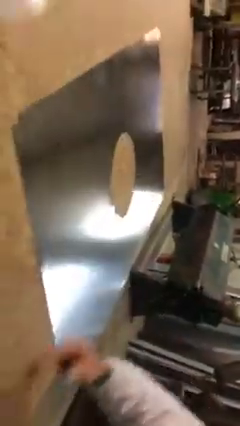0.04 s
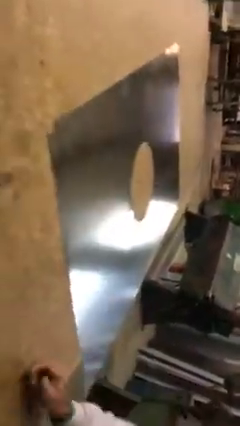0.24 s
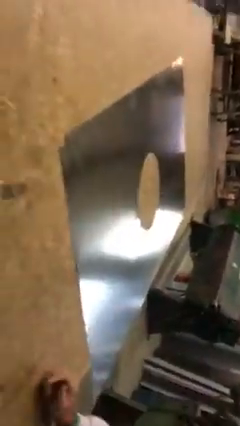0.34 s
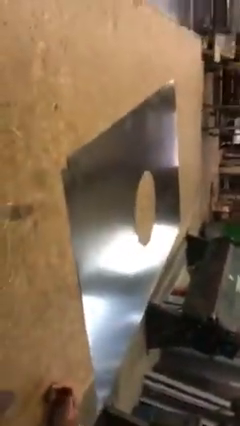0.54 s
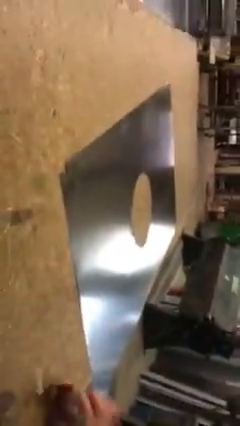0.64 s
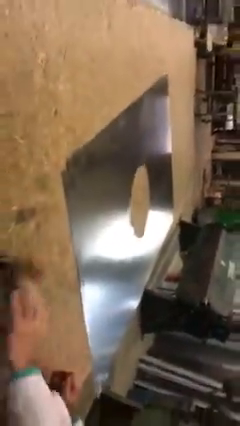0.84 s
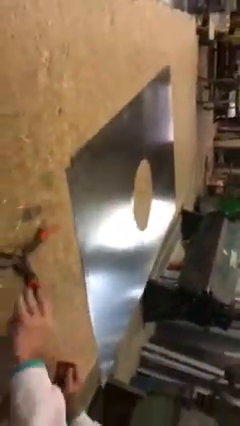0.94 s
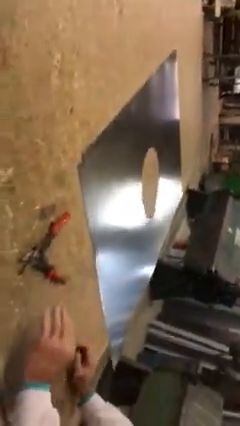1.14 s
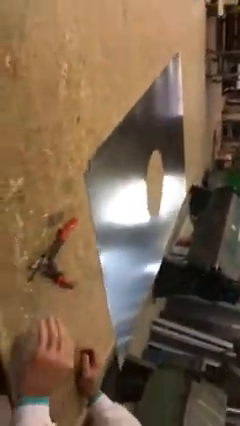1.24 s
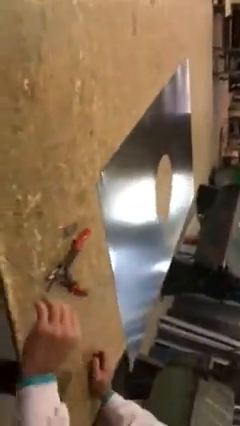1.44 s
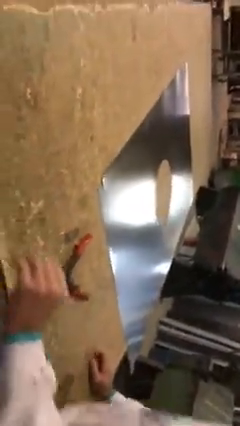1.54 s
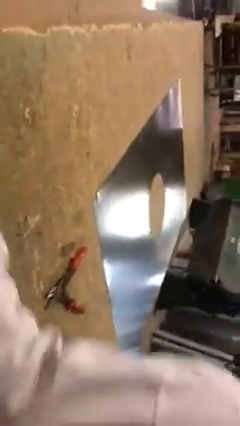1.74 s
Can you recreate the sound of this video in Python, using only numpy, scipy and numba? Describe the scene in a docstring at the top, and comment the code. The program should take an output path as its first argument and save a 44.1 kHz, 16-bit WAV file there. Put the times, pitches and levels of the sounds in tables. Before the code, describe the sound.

A large thin metal sheet slaps onto a wooden workbench at 0.2 seconds, just after a faint knock. It flexes and slaps again around 0.5, rattling and ringing. At 0.9 a tossed spring clamp clatters on the wood, bouncing to rest by 1.1. The sheet rasps lightly at 1.2 and 1.6. The sound is close, with slight workshop reverberation and a low machine hum that grows near the end.

```python
"""A faint knock and scrape, then a large thin metal sheet slaps down on a wooden workbench, flexes
and slaps again; its chattering contacts ring the metal and drum on the wood. A tossed spring clamp
bounces to rest, sending bending waves through the bench top. The sheet is nudged and rasps a little.
One microphone close to the bench, in mono; behind it the workshop reverberates and a machine hums low."""
import sys
import numpy as np
from scipy import signal
from scipy.fft import rfft, irfft
from scipy.io import wavfile
from numba import njit

SR = 44100
rng = np.random.default_rng(int(sys.argv[2]) if len(sys.argv) > 2 else 0)


def wav_out(sig):
    """Save sig, one row per channel (or a flat mono array), as 16-bit PCM at SR to the path in sys.argv[1]."""
    wavfile.write(sys.argv[1], SR, np.round(np.clip(np.atleast_2d(sig).T, -1, 1) * 32767).astype(np.int16))


N = 79380
TIME = np.arange(N) / SR

# Table levels are relative; spectra give the level per Hz.
# parts of the sheet landing: t/s, rise/s, fall/s, ring/dB, sizzle/dB, bench/dB, thud/dB
SLAPS = [(0.2075, 0.00017, 0.0058, -10, -43, -18, -35), (0.215, 0.0019, 0.0058, -31, -21.5, -14, -42),
         (0.236, 0.013, 0.0089, -10, -52, -33, -26), (0.256, 0.005, 0.032, -16, -26, -33, -28),
         (0.326, 0.015, 0.0077, -20, -42.5, -36, -40), (.350, 0.014, 0.033, -18, -29.5, -52, -56),
         (0.475, 0.012, 0.023, -24, -32, -33, -51), (0.51, 0.0095, 0.042, -16.5, -23.5, -36.5, -41),
         (0.532, 0.0024, 0.0069, -16, -26.5, -24, -34), (0.568, 0.023, 0.027, -25.5, -32.5, -40.5, -56),
         (0.611, 0.022, 0.025, -38.5, -36.5, -38, -38.5), (0.689, 0.017, 0.043, -35, -55, -48.5, -48)]
# the sheet's dense modes: f/Hz, level/dB
SHEET_SPECTRUM = [(300, -13.5), (550, -14), (800, -9.5), (1200, -2), (2100, -2), (3100, -3), (4200, -17.5),
                  (6500, -23), (10000, -29.5), (16000, -38.5)]
# their decay: f/Hz, t60/s
SHEET_T60 = [(300, .15), (700, 0.68), (1500, 0.31), (3000, .4), (6000, 0.74), (16000, 0.56)]
# sheet modes that stand out: f/Hz, level/dB, t60/s
SHEET_MODES = [(637.7, -18.5, 0.28), (1161, -25.5, 0.26), (1254, -17.5, 0.53), (1494, -21.5, .45),
               (1558, -26, 1), (1743, -15, 0.55), (2180, -22, .6), (2238, -17.5, .5), (2432, -21, 0.22),
               (2546, -16, 0.32), (3009, -28, 0.43)]
# the sheet's sizzling edges: f/Hz, level/dB
SIZZLE_SPECTRUM = [(1500, -5.5), (3500, 5), (6300, 6), (9000, -6.5), (12000, -5.5), (16000, -16)]
# the bench drumming under the sheet: f/Hz, level/dB
BENCH_SPECTRUM = [(90, -0.5), (150, -2.5), (230, 0), (330, 2.5), (450, -7), (700, -3), (1200, -10.5),
                  (2500, -31)]
# the sheet flexing: t/s, spread/s, f/Hz, climb/(octaves per s), level/dB
FLEXES = [(.222, .012, 1100, 12, -17.5), (.260, 0.018, 2050, 3, -16), (.325, .010, 715, 2.78, -27),
          (0.485, .013, 893, 11, -24.5), (.540, .02, 1700, 6.5, -32)]
# knocks, mostly the clamp: t/s, chirp/dB, contact low-pass/Hz, tick/dB, bench ring/dB, boom/dB
KNOCKS = [(0.112, -32, 1620, -63, -27.5, -7.5), (.2080, 17, 3380, 0.5, 2, 5),
          (0.8903, 8, 3440, -3.5, 2.5, 15), (.8918, 2, 3000, 4, 1, 0), (0.8929, 10.5, 3900, 4, 1.5, 5),
          (0.895, -14, 2960, -9, -5, -3), (0.9073, -6, 1200, -19, -3, 4), (0.917, -18, 3960, -11, -16, -18),
          (0.9321, -1, 4040, -6, -23, -18), (0.9368, 11, 3340, -9, -16, 6),
          (0.9384, 14.5, 4600, -1.5, -24, 16.5), (0.941, -13, 3050, -10, -20, -6),
          (.9660, 23, 1595, -8, -11.5, 10), (0.9689, 15, 1540, -31, -25, -9),
          (0.9708, 13.5, 1500, -24, -27, 5), (0.9912, -3, 1900, -31, -11, -14),
          (1.0016, 15, 1600, -18, -10, 10.5), (1.004, 10, 1500, -30, -24, -7),
          (1.0297, -13, 2600, -34, -20, 6.5), (1.0480, 11.5, 1940, -26, -25, -4),
          (1.0652, 6, 2120, -42, -18, -19), (1.0873, 6.5, 2540, -45, -21, -6),
          (1.5946, -5, 1550, -54, -11, -5.5)]
# the metal's tick: f/Hz, level/dB
TICK_SPECTRUM = [(800, -6.5), (2000, 6), (3300, 3.5), (5000, -6), (6500, -4), (9500, -6), (12500, -23),
                 (16000, -16.5)]
# modes of the knocked bench: f/Hz, level/dB, t60/s
BENCH_MODES = [(78.3, -46.5, 0.245), (120.7, -39.5, 0.23), (213, -30.5, 0.053), (329.4, -21.5, .09),
               (532, -31.5, 0.032), (726, -24, 0.032), (1211, -25.5, 0.031)]
# the bench frame rumbling under the clamp: t/s, rise/s, fall/s, level/dB
RUMBLES = [(.950, 0.024, 0.076, -36), (1.040, 0.022, 0.042, -36)]
# metal sliding on wood: t/s, rise/s, fall/s, rasp/dB, hiss/dB, sheen/dB
SLIDES = [(0.136, 0.011, 0.03, -53.5, -74, -65), (.835, 0.015, 0.062, -38.5, -54.5, -64),
          (1.204, 0.017, 0.033, -43.5, -65, -54.5), (1.32, 0.045, 0.026, -64, -67.5, -85),
          (1.618, 0.0066, 0.0089, -37.5, -45, -63), (1.633, 0.011, 0.011, -34, -42.5, -57),
          (1.651, 0.0097, 0.021, -32.5, -43.5, -59)]
# midrange of the friction: f/Hz, level/dB
RASP_SPECTRUM = [(200, -5.5), (500, -21), (1000, -15), (1600, -9.5), (1900, -4), (2120, 0.5), (2400, -6.5),
                 (3100, -8), (4000, -18), (7000, -21.5), (16000, -40.5)]
# its treble: f/Hz, level/dB
HISS_SPECTRUM = [(2500, -19.5), (5000, 6.5), (7000, -1.5), (9500, -3), (13000, -3.5), (16000, -11)]
# its very top: f/Hz, level/dB
SHEEN_SPECTRUM = [(8000, -22.5), (10500, -11), (12800, 0.5), (16000, -7.5)]
# workshop room tone: f/Hz, level/dB
FLOOR_SPECTRUM = [(20, -31.5), (45, -8), (70, -1), (110, -1.5), (160, -9.5), (250, -16.5), (450, -29),
                  (1000, -28.5), (2000, -32.5), (4000, -42), (8000, -49), (16000, -56)]
# the machine's hum, louder near the end: t/s, level/dB
HUM_LEVELS = [(0, -57.5), (1.15, -58), (1.35, -51), (1.5, -42), (1.8, -41)]
# the workshop's reverberation: f/Hz, level/dB
ROOM_SPECTRUM = [(100, 1.5), (400, -1.5), (1000, 0.5), (2200, -4), (4000, -2), (9000, -7), (16000, -11.5)]
# its decay: f/Hz, t60/s
ROOM_T60 = [(100, 0.2), (1000, 0.49), (2200, 0.76), (5000, 0.54), (16000, 0.38)]

CHATTER_PER_S, SLIDE_GRAINS_PER_S, GRAIN_SPREAD_DB = 7000, 5000, 2.5
EDGE_HZ, EDGE_RISE_HZ_PER_S = 424, 840   # low edge of the sheet's ring
THUD_HZ, BENCH_T60_S, TICK_T60_S = 67, 0.044, 0.026
CHIRP_LOW_HZ, CHIRP_TOP_HZ, BOOM_BAND_HZ = 745, 3600, (131.4, 480)
FLOOR_DB, HUM_HZ = -46, 123.5
HANDLING_DB, HANDLING_FADE_DB_PER_S = -52.5, 82.5
SHEET_SEND_DB, KNOCK_SEND_DB, SLIDE_SEND_DB = -18, -15, -13


def sheet(places=6):
    """Chatter at several places rings the sheet, sizzles at its edges and drums on the bench."""
    ring, sizzle, bench, thud = swells(SLAPS)
    metal = sum(through(ring * grains(CHATTER_PER_S), response(SHEET_SPECTRUM, SHEET_T60))
                for _ in range(places)) / np.sqrt(places)
    clear_modes = sum(from_db(db) * rms_one(mode(hz, t60)) * rng.choice([-1, 1])
                      for hz, db, t60 in SHEET_MODES) / np.sqrt(N)
    metal += through(ring * grains(CHATTER_PER_S), clear_modes)
    # the lowest ring climbs as the sheet lies flatter
    settling_s = np.clip(TIME - SLAPS[0][0], 0, SLAPS[-1][0] - SLAPS[0][0])
    edge_hz = EDGE_HZ + EDGE_RISE_HZ_PER_S * settling_s
    for _ in range(2):
        metal = moving_high_pass(metal, 2 * np.pi * edge_hz / SR, damping=0.97)
    wood = through(bench * grains(CHATTER_PER_S), response(BENCH_SPECTRUM, [(THUD_HZ, BENCH_T60_S)]))
    metal += flexes()
    edges = sizzle * colour(grains(CHATTER_PER_S), SIZZLE_SPECTRUM)
    return metal + wood + edges + thud * narrow_tone(THUD_HZ, width_hz=19)


def flexes():
    """Bending stiffens the sheet: a cluster of modes swells and glides upward."""
    out = 0
    for s, spread, hz, climb, db in FLEXES:
        octaves = climb * np.clip(TIME - s, -3 * spread, 3 * spread)
        offset_hz = hz * (2 ** octaves - 1)
        phase = np.angle(narrow_band(hz, width_hz=240)) + 2 * np.pi * np.cumsum(offset_hz) / SR
        out += from_db(db) * rms_one(np.cos(phase)) * np.exp(-((TIME - s) / spread) ** 2 / 2)
    return out * (TIME > SLAPS[0][0])


def knocks():
    """Each contact ticks in the metal, rings the bench and sends a falling chirp and boom through it."""
    chirps, ticks, pushes, booms = np.zeros((4, N))
    for s, chirp_db, contact_hz, tick_db, bench_db, boom_db in KNOCKS:
        click = signal.unit_impulse(N, int(s * SR))
        chirps += from_db(chirp_db) * butterworth(click, contact_hz, "low")
        ticks += from_db(tick_db) * through(click, metal_tick())
        pushes += from_db(bench_db) * click
        booms += from_db(boom_db) * click
    chirps = butterworth(chirps, CHIRP_LOW_HZ, "high")
    chirps = butterworth(chirps, CHIRP_TOP_HZ, "low", order=4)
    chirps = bending_wave(chirps, bend_hz=1300, stages=4)
    booms = butterworth(booms, BOOM_BAND_HZ, "band")
    booms = bending_wave(booms, bend_hz=273, stages=14)
    bench_ring = sum(from_db(db) * mode(hz, t60) * (-1) ** k
                     for k, (hz, db, t60) in enumerate(BENCH_MODES))
    rumble = swells(RUMBLES)[0] * narrow_tone(hz=77.7, width_hz=120)
    return chirps + booms + ticks + through(pushes, bench_ring) + rumble


def metal_tick():
    """Short response of heavily damped metal; unit energy."""
    tick = colour(even_noise(), TICK_SPECTRUM) * from_db(-60 * TIME / TICK_T60_S)
    return tick / np.linalg.norm(tick)


def bending_wave(x, bend_hz, stages):
    """Lows travel slower in the bench top: a chain of all-passes makes them arrive late."""
    pole = np.exp(-2 * np.pi * bend_hz / SR)
    for _ in range(stages):
        x = signal.lfilter([-pole, 1], [1, -pole], x + 1e-18)
    return x


def slides():
    """Fine grains of friction rasp and hiss as metal shifts on the wood."""
    spectra = RASP_SPECTRUM, HISS_SPECTRUM, SHEEN_SPECTRUM
    return sum(envelope * colour(grains(SLIDE_GRAINS_PER_S), spectrum)
               for envelope, spectrum in zip(swells(SLIDES), spectra))


def handling_ring():
    """At the start the sheet still rings faintly from being carried."""
    fade = from_db(HANDLING_DB - HANDLING_FADE_DB_PER_S * TIME)
    return fade * rms_one(narrow_band(hz=1810, width_hz=460).real)


def workshop():
    """Behind the bench: rumbling room tone and a machine humming on one low note."""
    hum_db = np.interp(TIME, *np.transpose(HUM_LEVELS))
    hum = from_db(hum_db) * rms_one(np.sin(2 * np.pi * HUM_HZ * TIME))
    return from_db(FLOOR_DB) * colour(even_noise(), FLOOR_SPECTRUM) + hum


def response(spectrum, t60s, bands=20):
    """Impulse response of modes too dense to count, each band dying at its own rate; unit energy."""
    hz, lines = np.fft.rfftfreq(N, 1 / SR), rfft(even_noise())
    edges_hz = np.geomspace(60, 18000, bands + 1)
    out = 0
    for low, high in zip(edges_hz, edges_hz[1:]):
        gain = from_db(at_hz(spectrum, hz)) * (hz >= low) * (hz < high)
        decay = from_db(-60 * TIME / at_hz(t60s, np.sqrt(low * high)))
        out += rms_one(irfft(lines * gain, N) * decay) * np.linalg.norm(gain)
    return out / np.linalg.norm(out)


def mode(hz, t60):
    """A decaying sine."""
    return np.sin(2 * np.pi * hz * TIME) * from_db(-60 * TIME / t60)


def grains(per_s):
    """Random tiny contacts of uneven size; unit rms."""
    sizes = from_db(GRAIN_SPREAD_DB * rng.standard_normal(N)) * rng.choice([-1, 1], N)
    return rms_one(sizes * (rng.random(N) < per_s / SR))


def swells(rows):
    """One envelope per level column: each event swells up to its time, then dies away."""
    power = 0
    for s, rise, fall, *levels in rows:
        shape = np.exp(-np.where(TIME < s, ((TIME - s) / rise) ** 2 / 2, (TIME - s) / fall))
        power += np.outer(from_db(levels), shape) ** 2
    return np.sqrt(power)


def narrow_tone(hz, width_hz):
    """A steady tone whose pitch wanders around hz; unit rms."""
    return rms_one(np.cos(np.angle(narrow_band(hz, width_hz))))


def narrow_band(hz, width_hz):
    """Complex noise in a narrow band."""
    offset_hz = np.fft.fftfreq(N, 1 / SR) - hz
    return np.fft.ifft(np.fft.fft(even_noise()) / (1 + (2 * offset_hz / width_hz) ** 4))


def even_noise():
    """Equally strong sines at every frequency, in random phase."""
    return rms_one(irfft(np.exp(2j * np.pi * rng.random(N // 2 + 1)), N))


def colour(x, spectrum):
    """Give a steady signal a spectrum; unit rms."""
    gain = from_db(at_hz(spectrum, np.fft.rfftfreq(N, 1 / SR)))
    return rms_one(irfft(rfft(x) * gain, N))


@njit
def moving_high_pass(x, step, damping):
    """Resonant high-pass; step is its moving corner in radians per sample."""
    out, low, band = np.zeros(len(x)), 0., 0.
    for i in range(len(x)):
        low += step[i] * band
        out[i] = x[i] - low - damping * band
        band += step[i] * out[i]
    return out


def butterworth(x, hz, kind, order=2):
    """Low-, high- or band-pass."""
    return signal.sosfilt(signal.butter(order, hz, kind, fs=SR, output="sos"), x + 1e-18)


def through(x, impulse):
    """Play a signal through an impulse response."""
    return signal.fftconvolve(x, impulse)[:N]


def at_hz(points, hz):
    """Read a table on a log-frequency axis."""
    f, value = np.transpose(points)
    return np.interp(np.log(hz + 1e-3), np.log(f), value)


def from_db(db):
    """Decibels to gain."""
    return 10 ** (np.asarray(db) / 20)


def rms_one(x):
    """Scale to unit rms."""
    return x / np.sqrt(np.mean(x ** 2) + 1e-20)


def scene():
    """Close to the bench: mostly direct sound, with the workshop's reverberation well below it."""
    background = handling_ring() + workshop()
    room = response(ROOM_SPECTRUM, ROOM_T60)
    metal, slid, knocked = sheet(), slides(), knocks()
    sent = (from_db(SHEET_SEND_DB) * metal + from_db(KNOCK_SEND_DB) * knocked
            + from_db(SLIDE_SEND_DB) * slid)
    return (metal + slid + knocked + through(sent, room) + background)[None]


def record(dry, cutoff_hz=16200):
    """The microphone chain rounds off peaks near full scale and cuts the very top."""
    rounded = dry / (1 + dry ** 6) ** (1 / 6)
    return signal.sosfilt(signal.ellip(10, .1, 80, cutoff_hz, fs=SR, output="sos"), rounded)


dry = scene()
out = record(dry)
wav_out(out)
```